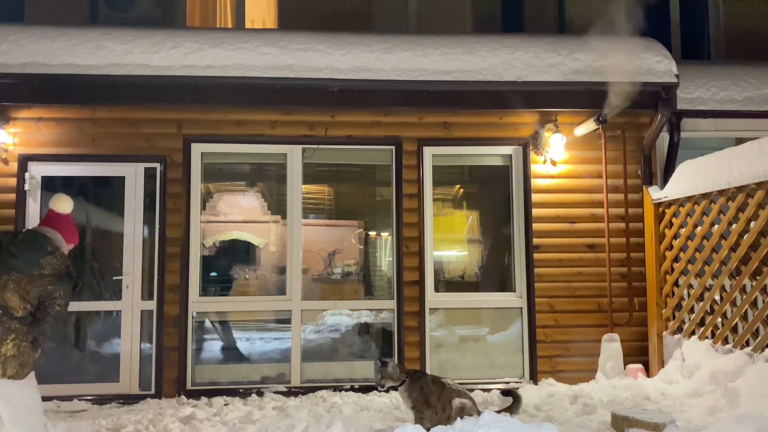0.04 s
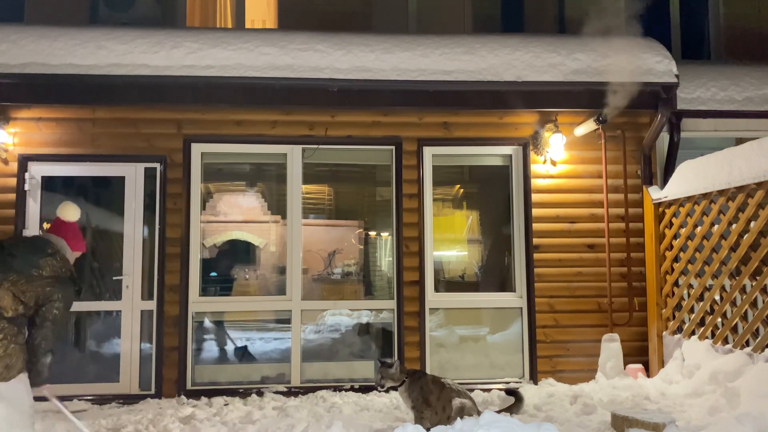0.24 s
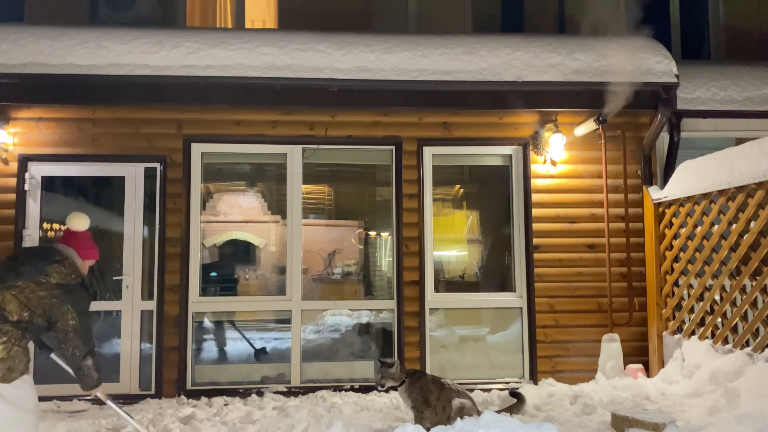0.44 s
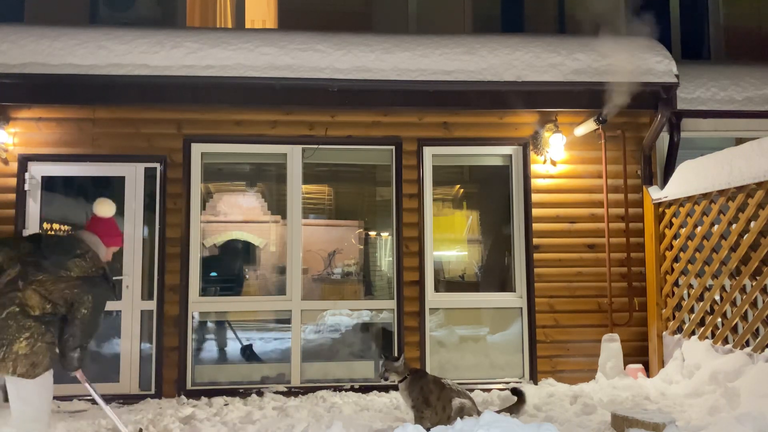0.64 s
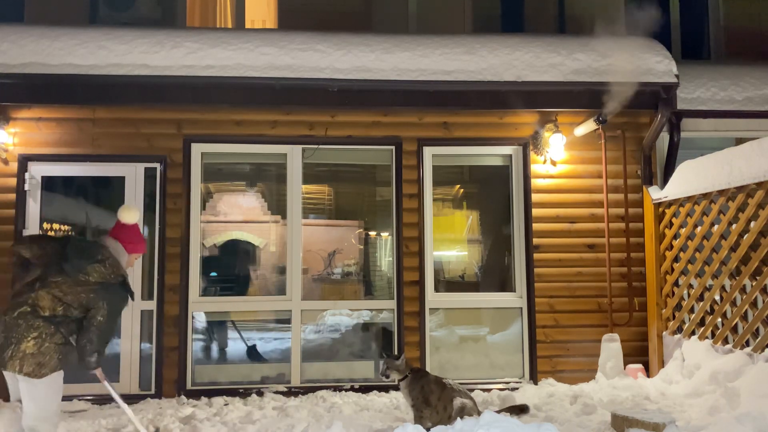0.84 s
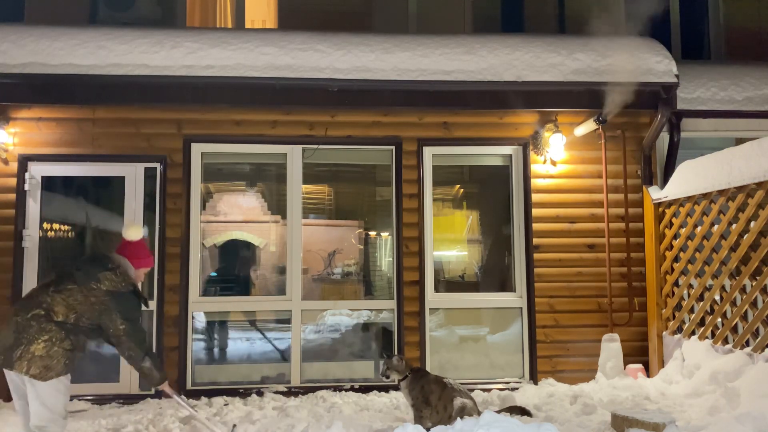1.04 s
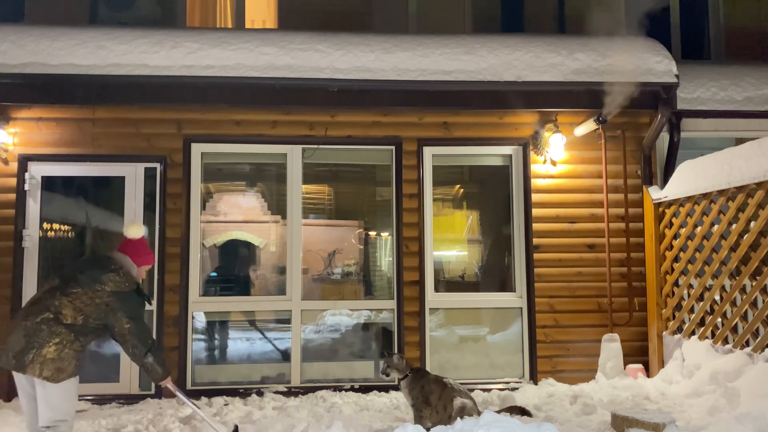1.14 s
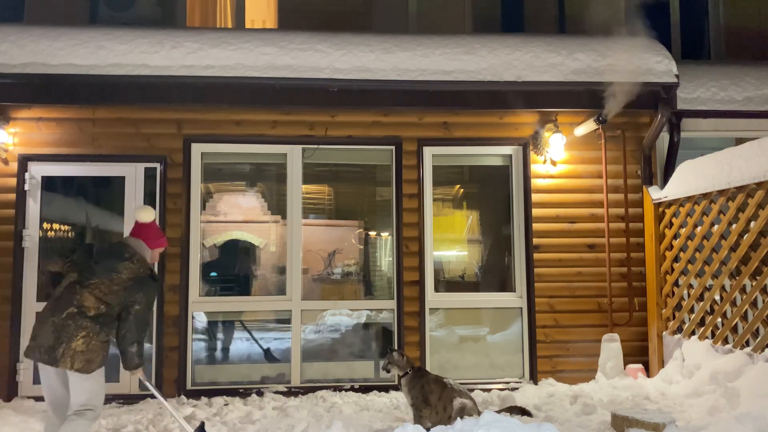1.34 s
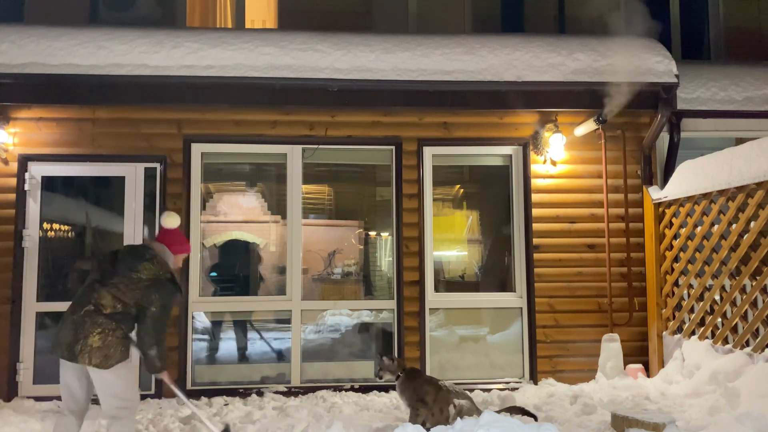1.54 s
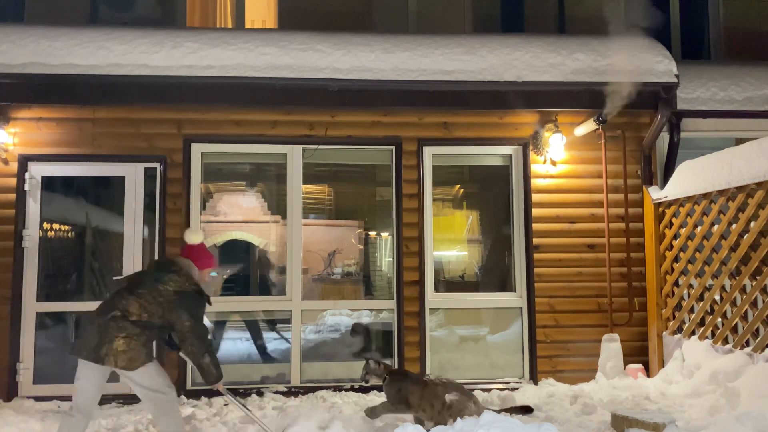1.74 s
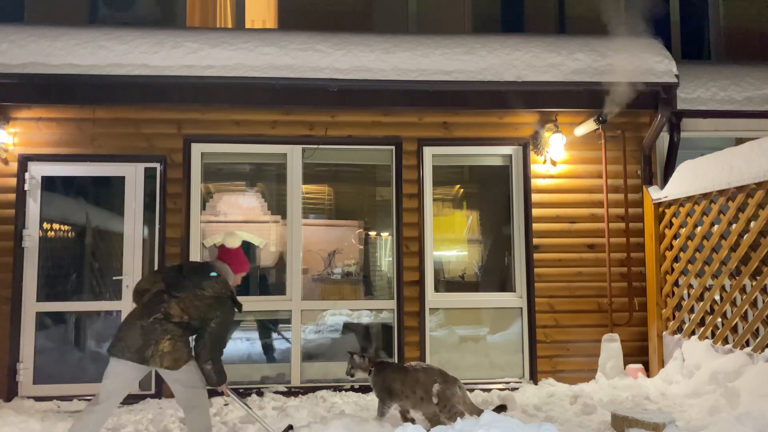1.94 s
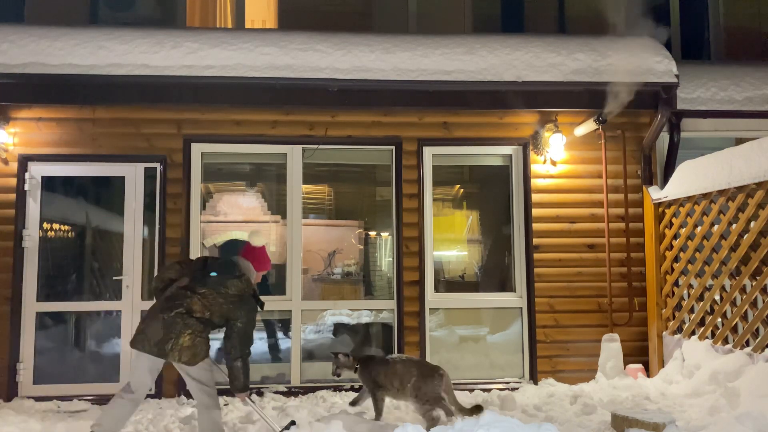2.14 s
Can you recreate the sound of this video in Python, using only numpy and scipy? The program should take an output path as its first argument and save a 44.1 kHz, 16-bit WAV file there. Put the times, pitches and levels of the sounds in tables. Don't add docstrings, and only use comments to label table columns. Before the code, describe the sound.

A snow shovel scrapes crusty snow in three rough pushes, its blade twice cracking on hard ground.

```python
import sys
import numpy as np
from scipy import signal
from scipy.fft import rfft, irfft, next_fast_len
from scipy.io import wavfile
from scipy.ndimage import uniform_filter1d, map_coordinates

SR = 44100
rng = np.random.default_rng(int(sys.argv[2]) if len(sys.argv) > 2 else 0)


def store_wav(level_fs):
    pcm = np.round(np.clip(np.atleast_2d(level_fs), -1, 1) * 32767)
    wavfile.write(sys.argv[1], SR, pcm.T.astype(np.int16))


def to_linear_factor(level_db):
    exponent = np.asarray(level_db, float) / 20
    return 10 ** exponent


N = 97020
T = np.arange(N) / SR


def unit(x):
    return x / np.sqrt(np.mean(x ** 2) + 1e-20)


def along(points, hz):
    f, v = np.transpose(points)
    return np.interp(np.log(hz + 1), np.log(f + 1), v)


def curves(rows):
    s, *cols = np.transpose(rows)
    return [np.interp(T, s, c) for c in cols]


def wobble(rate):
    knots = rng.standard_normal(int(N * rate / SR) + 4)
    return map_coordinates(knots, [T * rate])


def filtered(x, response):
    m = next_fast_len(N + SR // 2)
    return irfft(rfft(x, m) * response(np.fft.rfftfreq(m, 1 / SR)), m)[..., :N]


def add(track, s, sound):
    part = track[..., round(s * SR):][..., :sound.shape[-1]]
    part += sound[..., :part.shape[-1]]


def grit(per_s, spread_db):
    breaks = rng.random(N) < per_s / SR
    size = breaks * to_linear_factor(spread_db * rng.exponential(size=N))
    return (uniform_filter1d(size, size=5) + 0.18) * rng.standard_normal((2, N))


def scraping():
    # (time [s], scraping level [dB], fine powder over coarse snow [dB])
    strokes = [
        [(0, -65.5, -3), (.015, -61, 7), (.021, -54.5, 11.5), (.05, -47.5, 4.5), (.15, -53, 3)],
        [(.175, -43, -2.5), (.205, -38, 6), (.25, -32, 1.5), (.27, -28, -2.5), (.335, -36, -1), (.39, -45.5, 3),
         (.47, -56, -4)],
        [(.51, -55, 9.5), (.56, -50.5, 6.5), (.67, -59, 3.5), (.695, -51.5, -5), (.72, -60, -2.5)],
        [(.79, -49.5, 3.5), (.835, -40, 3), (.865, -35, 2), (.92, -34, 2), (1.0, -39.5, 2), (1.08, -46.5, 6.5),
         (1.16, -59, 2)],
        [(1.32, -57, 6), (1.37, -53, 2.5), (1.455, -61.5, 3.5)],
        [(1.5, -45.5, 2), (1.548, -35, -2.5), (1.57, -33.5, 0), (1.62, -37, 1), (1.69, -43, 3.5),
         (1.83, -60.5, 6), (1.93, -68, 3)],
        [(2.03, -62.5, 4.5), (2.11, -66, 4.5), (2.2, -73.5, -0.5)],
    ]
    # (frequency [Hz], density [dB per Hz])
    coarse_spectrum = [(35, -61), (60, -43), (353, -5), (937, -8.5), (1010, -6.5), (1140, -5), (3090, -13),
                       (7000, -29), (9100, -57), (15400, -120)]
    powder_spectrum = [(2500, -1.5), (5000, -3), (8000, -7.5), (11000, -3), (13300, -13.5), (14200, -12),
                       (15700, -18.5)]
    # (frequency [Hz], width [Hz], level [dB])
    blade_modes = [(237, 52, -5.5), (345, 12.5, -1), (510.4, 12.4, 5.5), (656, 21, 5), (783, 76, -5),
                   (888.5, 18.7, 6), (1009, 40, 1), (1270, 57, -2.5), (1503, 25, -1.5), (1725, 7.1, -1),
                   (2186, 12, -4), (2930, 180, -11.5), (3300, 22, -12.5), (4054, 67, -14.5)]
    grains_per_s, grain_spread_db = 9000, 1.3
    blade_db, powder_db = -1.5, -4.5
    push_uneven_db = 1

    level_db, fine_db = curves(np.vstack(strokes))
    level_db = level_db + .5 * wobble(24.04)
    coarse = unit(filtered(grit(grains_per_s, grain_spread_db), lambda hz: to_linear_factor(along(coarse_spectrum, hz))))

    def resonances(f):
        total = 0
        for k, (centre, wide, db) in enumerate(blade_modes):
            mode = 1j * f * wide / (centre * centre - f * f + 1j * f * wide)
            total = total + (-1) ** k * to_linear_factor(db) * mode
        return total

    push = unit(grit(grains_per_s, grain_spread_db) * to_linear_factor(push_uneven_db * wobble(31.03)))
    blade = filtered(push * to_linear_factor(level_db + blade_db + 20.5 - 0.19 * fine_db), resonances)
    powder = unit(filtered(grit(12000, 0.66), lambda hz: to_linear_factor(along(powder_spectrum, hz)) * (hz > 2500)))
    coarse_part = to_linear_factor(5.5 - 0.29 * fine_db + 0.43 * wobble(45.7)) * coarse
    powder_part = to_linear_factor(powder_db + fine_db + 0.32 * wobble(35.6)) * powder
    return blade + to_linear_factor(level_db) * (coarse_part + powder_part)


def strikes():
    # (time [s], ring level [dB], crack level [dB], crack frequency [Hz], grind length [s])
    first_hits = [
        (.199, -35.5, -23.5, 910, 0.0072),
        (.2545, -26, -18.5, 3400, 0.039),
        (.264, -16, -23, 2690, 0.019),
        (.277, -46, -30, 3300, 0.036),
    ]
    second_hits = [
        (1.5505, -29.5, -22.5, 7050, 0.0052),
        (1.551, -47.5, -13.5, 1630, 0.015),
        (1.557, -36, -14.5, 6000, 0.0019),
        (1.561, -21, -13, 2220, 0.031),
    ]
    # (frequency [Hz], level [dB], t60 [s])
    first_ring = [(262, -3, 0.063), (386, -12, 0.067), (660, -5, 0.1), (793, -5.5, .08), (892, -7, 0.24),
                  (848, -8.5, 0.11), (1055, -9, 0.17), (1194, -8, .1)]
    second_ring = [(345, -2.5, 0.14), (487, -4, .15), (680, -7, 0.16), (808, -1.5, 0.072),
                   (1503, -9, 0.096), (1950, -9.5, .08), (2235, -11, 0.067)]
    crack_width = 0.69
    ring_rise_s, ring_unsteady_db = 0.00056, 1.5

    out, t = np.zeros((2, N)), T[:SR // 3]
    for hits, ring in ((first_hits, first_ring), (second_hits, second_ring)):
        phases = rng.random((len(ring), 2, 1))
        for s, ring_db, crack_db, crack_hz, grind_s in hits:
            grind = rng.standard_normal((2, len(t))) * to_linear_factor(-30 * t / grind_s)
            rung = 0
            for (hz, db, t60), turns in zip(ring, phases):
                decay = to_linear_factor(db - 60 * t / t60 + ring_unsteady_db * wobble(92)[:len(t)])
                rung = rung + decay * np.sin(2 * np.pi * (hz * (t + s) + turns))

            def band(f):
                damping = 1j * f * crack_width * crack_hz
                return (damping / (crack_hz ** 2 - f * f + damping)) ** 2

            ringing = to_linear_factor(ring_db) * rung * (1 - np.exp(-t / ring_rise_s))
            crack = to_linear_factor(crack_db + 9.5) * filtered(grind, band)[:, :len(t)]
            add(out, s, ringing + crack)
    return out


def snags():
    # (time [s], level [dB], frequency [Hz], t60 [s])
    catches = [(0.167, -38, 328, 0.068), (.197, -30, 600, 0.021), (0.196, -31.5, 346.3, .05),
               (.211, -23.5, 613, 0.022), (.236, -33.5, 262, 0.066), (0.2543, -21.5, 1043, .07),
               (.2545, -25, 732, 0.065), (.264, -24, 1012, 0.046), (.263, -27, 190, 0.058),
               (.263, -25, 375, 0.039), (.276, -24.5, 868, 0.084), (.277, -26, 258.3, 0.12),
               (.287, -29.5, 382, 0.051), (.291, -23, 1002, .06), (.312, -29, 906, 0.091),
               (.331, -33, 1016, 0.083), (0.339, -27.5, 873, 0.039), (.775, -38.5, 305, 0.064),
               (.853, -30, 520, 0.078), (.862, -34.5, 266, 0.14), (0.87, -32, 875, 0.16),
               (.912, -33.5, 340, 0.16), (.916, -43, 950, .05), (.939, -52, 700, 0.044),
               (.972, -38, 740, 0.1), (0.989, -32, 384, 0.081), (1.043, -35.5, 1200, .05),
               (1.5513, -26, 1510, 0.044), (1.5513, -28, 6160, 0.0071), (1.5572, -25, 6660, .006),
               (1.556, -24.5, 321, .05), (1.5606, -17, 2000, 0.016), (1.5605, -26, 910, .015),
               (1.55, -30, 810, .05), (1.567, -22.5, 824, .05), (1.577, -29, 1530, .03),
               (1.575, -32, 345, 0.028), (1.588, -25, 378, .06), (1.589, -39, 1550, .04),
               (1.603, -39, 1650, 0.035), (1.613, -35, 333, 0.048), (1.643, -29, 481.4, 0.17),
               (2.11, -58.5, 2723, 0.093), (.045, -48, 889, 0.16), (.165, -41, 880, 0.092)]
    rise = 0.036
    out, t = np.zeros((2, N)), T[:SR // 5]
    for s, db, hz, t60 in catches:
        swing = np.sin(2 * np.pi * hz * t - np.array([[0], [np.pi / 2]]))
        add(out, s, to_linear_factor(db - 60 * t / t60) * (1 - np.exp(-t / (rise * t60))) * 2 * swing)
    return out


def pulse(hz, cycles, t):
    u = hz * t
    rise = 1 - np.exp(-u / .7)
    return np.sin(2 * np.pi * u) * to_linear_factor(-60 * u / cycles / 2) * rise * 2


def thuds():
    # (time [s], peak level [dB], frequency [Hz])
    collapses = [(0.043, -52, 140), (0.688, -48, 247), (0.706, -41, 232), (0.721, -48, 248),
                 (0.76, -36, 230), (0.794, -31.5, 233), (0.814, -32, 240), (0.834, -32.5, 295),
                 (0.856, -27.5, 264), (0.912, -30, 335), (1.027, -35, 318), (1.115, -45.5, 264),
                 (1.127, -44, 228), (1.165, -39.5, 183), (1.185, -40.5, 200), (1.212, -40.5, 177),
                 (1.238, -45.5, 345), (1.285, -48.5, 205), (1.325, -42, 174), (1.879, -43.5, 202),
                 (1.885, -39, 162), (1.905, -41, 127), (1.945, -50, 295), (2.008, -64, 110),
                 (2.08, -54.5, 347), (2.15, -53, 344), (2.177, -56.5, 345)]
    # (time [s], level [dB])
    knocks = [
        (0.048, -46),
        (0.265, -32.5),
        (.6, -52),
        (0.8, -34.5),
        (0.829, -35.5),
        (1.032, -38.5),
        (1.527, -38.5),
        (1.561, -37),
        (1.643, -41),
    ]
    # (time [s], level [dB], frequency [Hz], length [s])
    squeaks = [
        (0.99, -51.5, 1600, 0.075),
        (0.72, -66, 980, 0.039),
        (.785, -39, 600, 0.04),
        (1.625, -50, 233, 0.019),
        (2.105, -71, 2400, 0.043),
    ]
    # (time [s], pressure on the snow [dB])
    shuffle = [(0.0, -68), (0.12, -55.5), (0.28, -48.5), (0.74, -54.5), (0.95, -43), (1.35, -60.5),
               (1.46, -70), (1.6, -48), (1.78, -59.5), (1.91, -57.5), (2.2, -71)]
    shuffle_hz, shuffle_per_s = 238, 190

    out, patter, t = np.zeros(N), np.zeros(N), T[:SR // 7]
    for s, db, hz in collapses:
        add(out, s, to_linear_factor(db + 6.5) * pulse(hz, 3.3, t))
    for s, db in knocks:
        add(out, s, to_linear_factor(db) * pulse(132.5, 8.1, t))
    for when, a, b in rng.random((400, 3))[:int(shuffle_per_s * N / SR)]:
        small = pulse(shuffle_hz * 2 ** (1.724 * b - .9), 5.7, t)
        add(patter, when * N / SR, to_linear_factor(-14 * a) * small)
    for s, db, hz, long_s in squeaks:
        shape = np.sin(np.pi * np.clip(t / long_s, 0, 1)) * (1 + 1.4 * wobble(405)[:len(t)])
        add(out, s, to_linear_factor(db) * shape * np.sin(2 * np.pi * hz * t + 0.7 * wobble(226)[:len(t)]))
    out = out + to_linear_factor(curves(shuffle)[0]) * unit(patter)
    return np.array([out, np.roll(out, 60)])


def house(x):
    # (frequency [Hz], t60 [s])
    wall_decay = [(200, 0.16), (2000, 0.36), (10000, 0.073)]
    hz, t, z = signal.stft(rng.standard_normal((2, SR // 3)), SR, nperseg=256)
    decay = to_linear_factor(-60 * t / along(wall_decay, hz)[:, None])
    tail = signal.istft(z * decay, SR, nperseg=256)[1]
    delayed = np.pad(x, ((0, 0), (350, 0)))
    return signal.fftconvolve(delayed, tail / np.linalg.norm(tail[0]), axes=1)[:, :N]


def night():
    # (frequency [Hz], density [dB per Hz])
    air_spectrum = [(25, -24), (50, 13), (120, -1), (342, -13.5), (600, -5), (1380, -25), (5500, -50),
                    (15000, -48)]
    air = unit(filtered(rng.standard_normal((2, N)), lambda hz: to_linear_factor(along(air_spectrum, hz))))
    return to_linear_factor(-65.5 + 0.57 * wobble(2.8)) * air


def scene():
    low_cut_hz, house_db = 53, -10.5
    near = strikes() + thuds() + snags()
    shovel = scraping() + near + to_linear_factor(house_db) * house(near)
    return filtered(shovel, lambda hz: (1j * hz / (low_cut_hz + 1j * hz)) ** 2) + night()


def low_pass(x):
    return signal.sosfilt(signal.butter(12, 16770, fs=SR, output="sos"), x)


def record(dry):
    # (frequency [Hz], further phase by which the right port leads [rad])
    body_turn = [(330, .55), (520, 2.4), (800, 3.1), (1500, 1.1), (2600, .1), (3300, -1.1), (4100, -3.2),
                 (5500, -3.4), (6300, -6.3)]
    # (frequency [Hz], share of the field in common [0-1])
    alike = [(300, .95), (430, .5), (700, .7), (950, .45), (5300, .35), (7000, .6), (7800, .98),
             (16000, .97)]
    # (frequency [Hz], left minus right [dB])
    balance = [(100, -2.5), (350, -5.5), (800, -1.5), (2000, -4.5), (4000, 3), (6500, 0.5)]
    port_lag_s, top_hz = 8.05 / 44100, 15850
    side = np.array([[1], [-1]])

    def views(hz):
        turn = np.arccos(np.clip(along(alike, hz), 0, 1)) / 2
        return np.array([np.cos(turn), np.sin(turn)])

    def ports(hz):
        lead = 2 * np.pi * hz * port_lag_s + along(body_turn, hz)
        return (hz < top_hz) * to_linear_factor(side * along(balance, hz) / 2) * np.exp(-.5j * side * lead)

    front, flank = filtered(dry, views)
    mix = filtered(front + side * flank, ports)
    return low_pass(mix)


dry = scene()
out = record(dry)
store_wav(out)
```